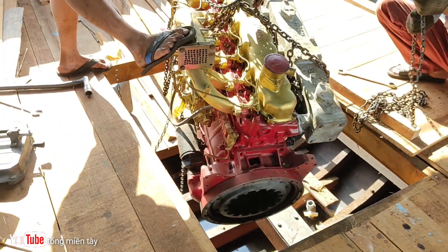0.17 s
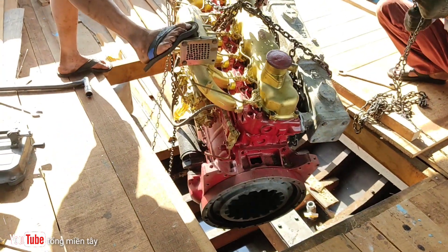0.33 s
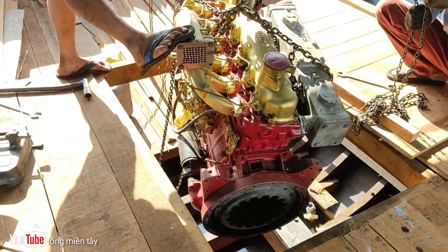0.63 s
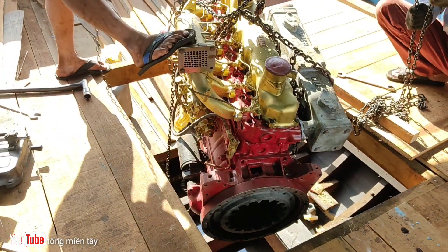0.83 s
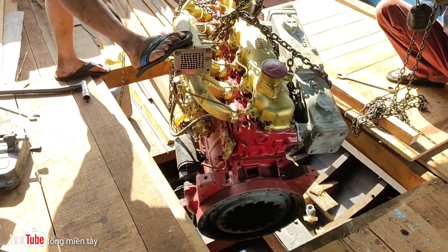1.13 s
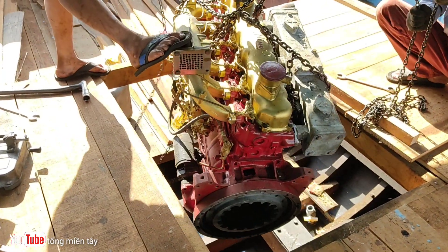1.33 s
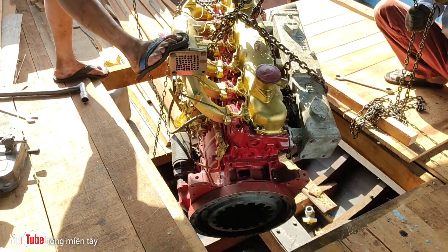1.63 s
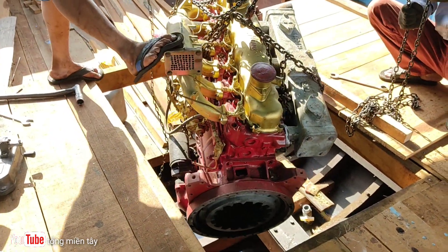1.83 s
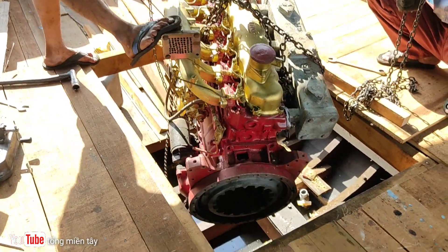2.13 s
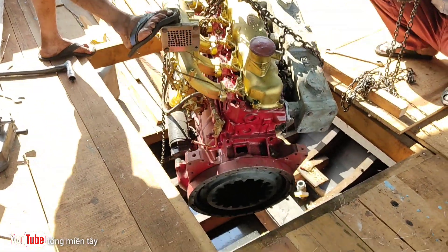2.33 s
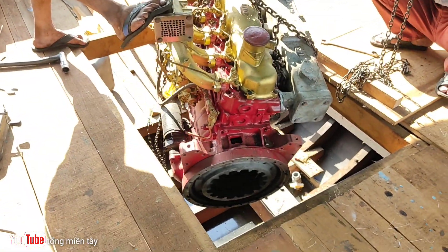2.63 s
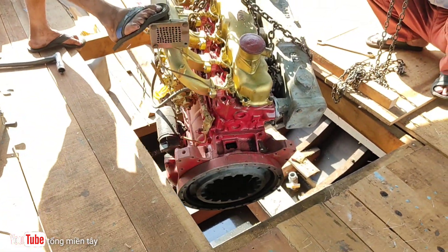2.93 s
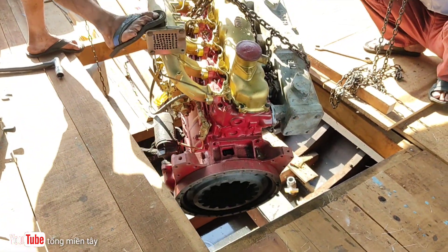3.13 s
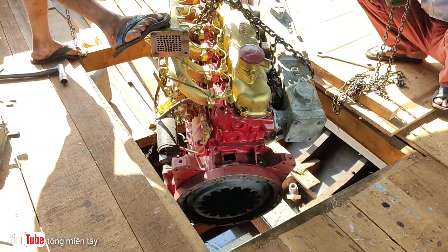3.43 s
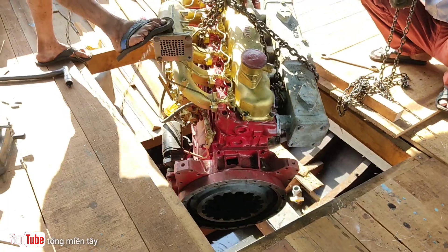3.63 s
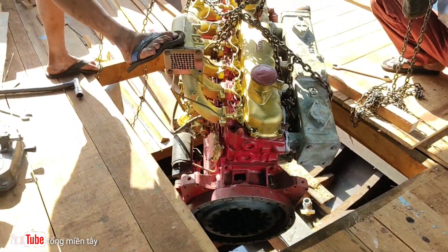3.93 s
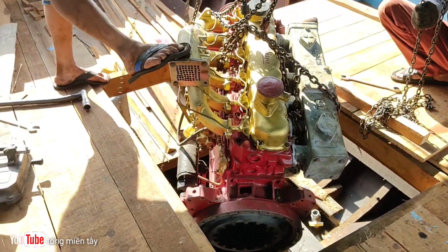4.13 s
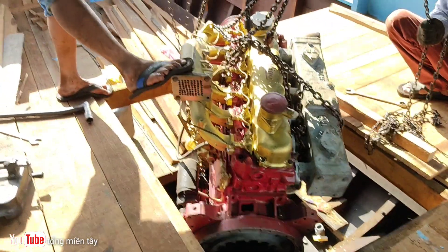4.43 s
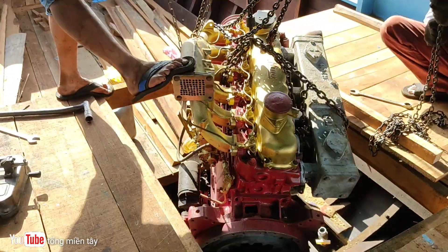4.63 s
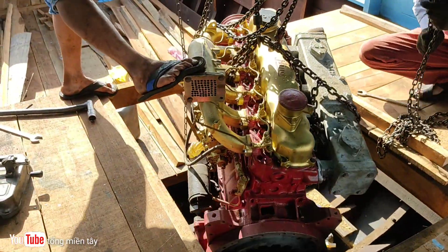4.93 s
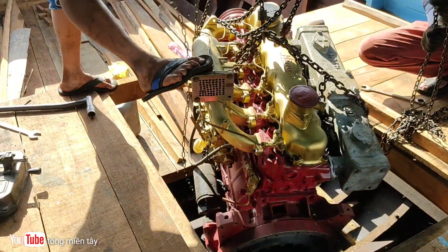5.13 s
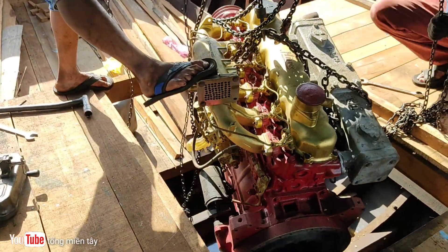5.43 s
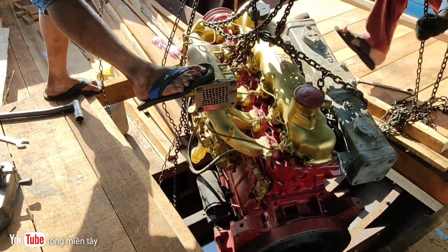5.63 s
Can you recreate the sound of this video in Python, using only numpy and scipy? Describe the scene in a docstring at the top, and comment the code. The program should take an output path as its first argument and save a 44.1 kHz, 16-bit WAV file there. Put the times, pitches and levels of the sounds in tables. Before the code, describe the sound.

Bright chain links rattle and clatter on planks in quick pulls, loose links clinking between them, while a far-off saw-like whine drops away.

```python
"""A wooden boat deck by a yard: hand chains are hauled through hoists.
In each pull links rattle over the wheel and onto the planks; between pulls they swing, slide and clink.
Chains are random contacts, coloured and fed to resonators, under level curves of each pull.
Low groans, a hull boom, knocks, clanks and a squeak join in. A far power tool, built of sines and hiss,
whines and runs down with an echo; the yard is a wavering noise floor."""
import sys
import numpy as np
from scipy import signal
from scipy.fft import rfft, irfft
from scipy.io import wavfile

SR = 44100
rng = np.random.default_rng(int(sys.argv[2]) if len(sys.argv) > 2 else 0)


def file_out(sig):
    """Save sig as 16-bit WAV at sys.argv[1]."""
    # one column per channel
    cols = np.atleast_2d(sig).T
    # limit, then scale
    lim = np.clip(cols, -1, 1)
    pcm = np.round(lim * 32767).astype(np.int16)
    wavfile.write(sys.argv[1], SR, pcm)


N = 255339
TIME_S = np.arange(N) / SR
BIN_HZ = np.maximum(np.fft.rfftfreq(N + 1, 1 / SR), 1)
# All dB levels in the tables are relative.
# Sources give two paths: the first reaches both microphones alike, the second with opposite sign.


def amp(db):
    """dB to gain."""
    return 10 ** (np.asarray(db) / 20)


def rms_one(x):
    """Scale to rms 1."""
    return x / np.sqrt(np.mean(x ** 2) + 1e-20)


def in_time(tables):
    """Curve columns at every sample, linear between rows."""
    s, *columns = np.transpose(np.concatenate(tables))
    return [np.interp(TIME_S, s, column) for column in columns]


def at_hz(points, hz):
    """A spectrum table read on a log-frequency axis."""
    table_hz, values = np.array(points).T
    return np.interp(np.log(hz), np.log(table_hz), values)


def colour(x, spectrum):
    """Smooth spectral shape."""
    return irfft(rfft(x, N + 1) * amp(at_hz(spectrum, BIN_HZ)))[..., :N]


def ring(x, hz, width_hz):
    """Two-pole resonator: a unit click starts a decaying sine of height near 1."""
    radius = np.exp(-np.pi * width_hz / SR)
    angle = 2 * np.pi * hz / SR
    return signal.lfilter([0, np.sin(angle)], [1, -2 * radius * np.cos(angle), radius ** 2], x + 1e-18)


def body(hits, modes):
    """Resonances in parallel, signs alternating; white input of rms 1 gives each its dB."""
    out = 0
    for k, (hz, width_hz, db) in enumerate(modes):
        gain = amp(db) * np.sqrt(4 * np.pi * width_hz / SR)
        out = out + (-1) ** k * gain * ring(hits, hz, width_hz)
    return out


def drift(rate_hz):
    """Slow chance: random knots of spread 1, joined by lines."""
    knots = rng.standard_normal(int(N / SR * rate_hz) + 2)
    return np.interp(TIME_S * rate_hz, np.arange(len(knots)), knots)


def contacts(per_s, spread_db):
    """Two unrelated trains of random contacts of uneven size and random sign, rms 1."""
    signs = rng.choice([-1, 1], (2, N))
    sizes = amp(spread_db * np.minimum(rng.exponential(1, (2, N)), 4)) * signs
    return rms_one(sizes * (rng.random((2, N)) < per_s / SR))


def settling(events, rise_s=0.00021):
    """Envelopes: each event rises quickly and dies away; its shift weakens path one, lifts path two."""
    power = np.zeros((2, N))
    for peak_s, peak_db, t60_s, shift_db in events:
        t = np.arange(N - round((peak_s - rise_s) * SR)) / SR
        settle = amp(peak_db - 60 * t / max(t60_s, .02)) * np.minimum(t / max(rise_s, 1e-4), 1)
        power[:, N - len(t):] += (settle * amp([[-shift_db], [shift_db]])) ** 2
    return np.sqrt(power)


def whine(tables, blur_rad):
    """A tone's phase follows its pitch curve, wandering differently on each path; ends are faded."""
    pitch_hz, level_db = in_time(tables)
    start_s, end_s, fade_s = tables[0][0][0], tables[-1][-1][0], 0.039
    heard = np.clip(np.minimum(TIME_S - start_s, end_s - TIME_S) / fade_s, 0, 1)
    clean = 2 * np.pi * np.cumsum(pitch_hz) / SR
    blurred = np.array([clean + blur_rad * drift(70) for path in range(2)])
    return clean, blurred, heard * amp(level_db + 4.5)


WAKE_DB = 14   # how far below full level a pull starts


def stroke(start_s, rise_s, stop_s, fall_db_per_s):
    """Level in dB against full as a pull wakes, holds and dies away; and the share of it gone by."""
    waking_db = WAKE_DB * np.maximum(1 - (TIME_S - start_s) / max(rise_s, .002), 0)
    falling_db = fall_db_per_s * np.maximum(TIME_S - stop_s, 0)
    return -waking_db - falling_db, np.clip((TIME_S - start_s) / (stop_s - start_s), 0, 1)


# Pulls on the hand chain. Each row: start in seconds, rise to full speed in seconds, length in seconds,
# link rattle in dB, slackening by the end in dB, plank clatter in dB, deck ringing in dB, hull boom in dB.
PULLS = [(-.05, 0.0056, 0.13, -15.5, 11, -22.5, -23, -21.5),
         (0.586, 0.022, 0.37, -20, 1.5, -19.5, -24.5, -21.5),
         (2.202, 0.056, 0.15, -18, 3.5, -22, -24, -20.5), (2.762, 0.018, 0.36, -19, 5, -23.5, -21.5, -24.5),
         (3.535, 0.048, 0.36, -18, 2.5, -19.5, -21, -20.5), (5.083, 0.01, 0.3, -21, 2.5, -23.5, -26, -21.5),
         (5.402, 0.0075, 0.19, -21.5, -0.5, -24.5, -24.5, -22.5)]
# A few slack links slide. Each row: loudest moment in seconds, link rattle in dB, plank clatter in dB,
# deck ringing in dB, dying away in dB per second.
SLIDES = [(0.245, -45, -24.5, -21, 105), (.3, -46, -26.5, -25, 137), (.46, -37, -41, -52, 245),
          (1.095, -26.5, -37, -50, 165), (1.239, -30, -60, -63, 300), (1.741, -33.5, -36, -42, 350),
          (2.063, -33.5, -56, -41, 190), (2.516, -36, -29, -41, 163), (2.606, -24.5, -59, -48, 200),
          (3.464, -24.5, -45, -57, 100), (4.211, -27, -31, -26, 250), (4.276, -21, -29.5, -45, 243),
          (4.48, -32.5, -44, -48, 77), (4.578, -25.5, -47, -50, 200), (4.6, -40, -29.5, -35, 170),
          (4.718, -52, -34.5, -42, 64), (4.79, -32.5, -58, -57, 148), (4.87, -47, -39, -55, 98),
          (5.765, -39, -32, -41, 254)]
# The hanging chains never quite rest. Each row: time in seconds, link rattle in dB, plank clatter in dB,
# deck ringing in dB, hull boom in dB.
SWING = [(0, -24, -50, -37, -29), (.55, -51, -46, -46, -42), (1.1, -42, -49, -63, -27.5),
         (1.5, -42.5, -46.5, -52, -39.5), (1.7, -46.5, -53, -67, -40), (2.15, -45, -45.5, -50, -58),
         (2.7, -37, -65, -56, -37.5), (3.3, -43.5, -47, -49, -27.5), (3.5, -42, -38.5, -55, -37),
         (4.1, -38, -40, -38, -24), (4.42, -44, -46, -55, -37.5), (4.7, -41.5, -40.5, -42, -37.5),
         (5.04, -43, -60, -60, -30.5), (5.79, -44, -65, -43, -28)]
RATTLE_FALL_DB_PER_S, SLIDE_RISE_DB_PER_S = 186, 448
# links reach the planks late, thickest in mid pull
CLATTER_EXTRA_RISE_S, CLATTER_ARCH_DB, CLATTER_FALL_DB_PER_S = 0.048, 7, 194
RINGING_RISE_S, RINGING_FALL_DB_PER_S = 0.0083, 199
BOOM_EXTRA_RISE_S, BOOM_LINGERS_S, BOOM_FALL_DB_PER_S = 0.062, 0.063, 98


def haul():
    """Levels in dB of rattle, clatter, ringing and boom: powers of swinging, pulls and slides add up."""
    power = amp(in_time([SWING])) ** 2
    for start_s, rise_s, length_s, rattle_db, slacken_db, clatter_db, ringing_db, boom_db in PULLS:
        stop_s = start_s + length_s
        rattle, gone = stroke(start_s, rise_s, stop_s, RATTLE_FALL_DB_PER_S)
        clatter, _ = stroke(start_s, rise_s + CLATTER_EXTRA_RISE_S, stop_s, CLATTER_FALL_DB_PER_S)
        ringing, _ = stroke(start_s, RINGING_RISE_S, stop_s, RINGING_FALL_DB_PER_S)
        boom, _ = stroke(start_s, rise_s + BOOM_EXTRA_RISE_S, stop_s + BOOM_LINGERS_S, BOOM_FALL_DB_PER_S)
        arch_db = CLATTER_ARCH_DB * (2 * gone - 1) ** 2
        power += amp([rattle_db + rattle - slacken_db * gone,
                      clatter_db + clatter - arch_db,
                      ringing_db + ringing,
                      boom_db + boom]) ** 2
    for peak_s, *levels_db, fall_db_per_s in SLIDES:
        shape_db = np.minimum(SLIDE_RISE_DB_PER_S * (TIME_S - peak_s), fall_db_per_s * (peak_s - TIME_S))
        power[:3] += amp(np.add.outer(levels_db, shape_db)) ** 2
    return 10 * np.log10(power)


# A slack loop of chain jolts. Each row: peak in seconds, peak in dB, settling t60 in seconds, path shift in dB.
JOLTS = [(0.208, -17, 0.15, 3), (0.289, -28.5, 0.18, 2), (0.4255, -21, 0.29, 1), (0.559, -25, 0.13, 1),
         (0.5846, -13.5, 0.092, 2), (1.072, -20, 0.23, -0.5), (1.213, -28.5, 0.22, 6),
         (1.317, -19.5, 0.083, 1.5), (1.7158, -21, 0.1, 4.5), (2.0195, -27.5, 0.48, 1),
         (2.1638, -26, 0.12, -2), (2.1998, -13, 0.18, -3), (2.5092, -19.5, 0.21, 2),
         (2.5566, -23, 0.46, 4.5), (2.7302, -19.5, 0.11, 2.5), (2.7727, -21, 0.14, -3),
         (3.389, -15, 0.11, 0.5), (3.4536, -20.5, 0.087, 4.5), (3.479, -23, 0.11, 3),
         (3.5043, -14.5, 0.093, 1.5), (3.559, -13, 0.1, -2), (4.2025, -12.5, 0.047, 3),
         (4.247, -15, 0.17, -1), (4.449, -33.5, 1, -5), (4.5492, -22, 0.16, 2), (4.599, -25, 0.12, 0),
         (4.737, -24, 0.085, 0.5), (4.9955, -27, 0.059, -6), (5.078, -27.5, 0.33, -10), (5.092, -18, 1, 0),
         (5.4056, -15, 0.1, 0), (5.755, -18.5, 0.18, 1)]
# Thin links chink. Each row: peak in seconds, peak in dB, settling t60 in seconds, path shift in dB.
CHINKS = [(0.1835, -36, 0.2, 0), (0.415, -32, 0.33, 0), (1.0725, -31, 0.2, 0), (1.2131, -25, 0.28, 3),
          (1.4815, -36, 0.14, 0), (1.6841, -31, 0.17, 2), (2.018, -22, 0.28, 0), (2.2169, -28, 0.2, 3),
          (2.4992, -36, 0.2, 2), (2.7402, -35, 0.19, 2), (3.3897, -29, 0.25, -1), (3.4291, -28, 0.18, 0),
          (3.5149, -29, 0.2, 1), (4.2492, -38, 0.2, 0), (4.4493, -38, 0.18, -1), (4.6029, -32, 0.29, 0),
          (4.8219, -37, 0.18, 0), (5.4056, -33, 0.2, 0),]
# Tick spectrum of steel links. Each row: frequency in Hz, density in dB per Hz.
LINKS = [(1760, -15), (3000, -9), (3440, -9), (4070, -9), (4800, -7.5), (6030, -9), (6730, -2), (8570, 0.5),
         (9510, -4.5), (10300, -15.5), (13200, -22), (14600, -28), (15600, -45)]
# Treble filter for quiet passages. Each row: frequency in Hz, gain in dB.
QUIET_TREBLE = [(9600, -3), (10800, -11.5)]
# Resonances of the links. Each row: frequency in Hz, width in Hz, level in dB.
LINK_RINGS = [(3614, 50, -12), (4013, 21, -8.5), (4430, 24, -13.5), (5490, 35, -7.5), (5880, 36, -7),
              (6400, 15, -4), (6930, 48, -5), (7380, 17, -1.5), (7520, 18, -2.5), (8030, 23, -1.5),
              (8390, 18, -1), (8790, 13, -0.5), (8800, 19, -5), (9330, 120, -3)]
# Resonances of a thin link. Each row: frequency in Hz, width in Hz, level in dB.
THIN_LINK = [(12780, 30, 0), (13030, 43, -4), (12610, 98, -3.5)]
LINK_SPREAD = .012   # links differ by this share in pitch
JOLT_RISE_S = 0.0014   # a loop jolts link after link


def links(rattle_db):
    """Steel links tick against each other; a sparser set of contacts each rings one link pitch."""
    drive = np.hypot(amp(rattle_db + 2.0 * drift(70)), amp(-3.5) * settling(JOLTS, JOLT_RISE_S))
    ticks = colour(contacts(per_s=4000, spread_db=1.0) * drive, LINKS)
    quiet = np.clip(1 - drive / amp(-23.0), 0, 1)
    ticks = ticks * (1 - quiet) + colour(ticks * quiet, QUIET_TREBLE)

    hits = contacts(per_s=650, spread_db=3.0) * drive * amp(3 * drift(80))
    pitches = [(hz * (1 + LINK_SPREAD * step), width_hz, db)
               for hz, width_hz, db in LINK_RINGS for step in (-1, 0, 1)]
    dealt = rng.integers(0, len(pitches), (2, N))
    rings = sum(body(hits * (dealt == k), [mode]) for k, mode in enumerate(pitches))

    # thin links jingle at the least motion, so they follow the root of the drive
    thin_drive = np.hypot(amp(-40.5) * np.sqrt(drive), amp(-4.5) * settling(CHINKS, 2 * JOLT_RISE_S))
    thin = thin_drive * contacts(per_s=1100, spread_db=3.5)
    return amp(11.0) * ticks + amp(3.0) * rings + body(thin, THIN_LINK)


# Dull clatter of the planks. Each row: frequency in Hz, density in dB per Hz.
DECK = [(180, -10), (300, -5), (599, -3.5), (975, 0), (1320, -1.5), (1590, -6.5), (2610, -2), (3060, -11),
        (4500, -21.5), (5850, -51), (9900, -120)]
# Deck resonances. Each row: frequency in Hz, width in Hz, level in dB.
DECK_RINGS = [(996.5, 53, 1), (1117, 137, -1.5), (913, 66, -17), (2520, 57, -12), (1984, 25, -12.5)]
# The deck's higher ring. Each row: frequency in Hz, width in Hz, level in dB.
HIGH_RING = [(1297.4, 17, -5.5)]
# Higher ring against the other deck rings. Each row: time in seconds, level in dB.
HIGH_RING_SHARE = [(0, 0), (1, -16), (2.3, -6.5), (3, -6), (3.8, -5), (5.0, 8.5), (5.5, -1), (5.56, -9),
                   (5.79, -10)]
# Heavier links land, sounding DECK_RINGS. Each row: peak in seconds, peak in dB, settling t60 in seconds,
# path shift in dB.
LOW_RING_HITS = [(.287, -27, .1, 5), (2.206, -22.5, 0.044, -4), (2.356, -18, .05, 7),
                 (2.912, -17, 0.056, -1), (2.963, -21, 0.045, -3), (3.044, -20.5, 0.036, -3),
                 (3.812, -16, 0.038, -1), (5.266, -16, 0.045, -5), (5.347, -20, 0.031, -6),
                 (5.556, -21.5, 0.13, -8), (5.597, -17, 0.092, -1.5)]
# Heavier links land, sounding HIGH_RING. Each row: peak in seconds, peak in dB, settling t60 in seconds,
# path shift in dB.
HIGH_RING_HITS = [(.107, -19.5, 0.037, -1), (3.6366, -21, .05, 5), (5.085, -9.5, 0.079, 0),
                  (5.218, -14, 0.31, -3.5), (5.415, -14.5, .06, -3.5), (5.455, -8.5, 0.076, -3)]


def planks(clatter_db, ringing_db):
    """Links tumbling on the planks: dull clatter and the deck's own resonances."""
    hits = contacts(per_s=1500, spread_db=-0.5) * amp(2.0 * drift(30))
    landing = contacts(per_s=5000, spread_db=1.0) * amp(6)
    high_share_db = in_time([HIGH_RING_SHARE])[0]
    low = hits * amp(ringing_db) + landing * settling(LOW_RING_HITS)
    high = hits * amp(ringing_db + high_share_db) + landing * settling(HIGH_RING_HITS)
    clatter = colour(hits * amp(clatter_db), DECK)
    return amp(12.5) * clatter + amp(-5.5) * (body(low, DECK_RINGS) - body(high, HIGH_RING))


# Hull resonances. Each row: frequency in Hz, width in Hz, level in dB.
HULL = [(136.7, 28.4, 1.5), (166.6, 50, 3.5), (210.4, 45, 0.5), (310.6, 25, -10.5), (91.6, 14, -5)]


def hull(boom_db):
    """The hollow hull under the deck booms when the chain runs: noise through low resonances."""
    return rms_one(body(rng.standard_normal((2, N)), HULL)) * amp(boom_db - 6.0)


# A low tone sags in pitch as a pull sets in, one table per groan. Each row: time in seconds, pitch in Hz,
# level in dB.
GROANS = [
    [(2.2, 173.7, -44), (2.255, 166, -23), (2.29, 150, -36), (2.35, 156.6, -29), (2.46, 149, -46)],
    [(2.8, 187.2, -50), (2.86, 179.4, -34), (2.95, 134.4, -35), (3.11, 139.6, -32.5), (3.24, 135, -31),
     (3.31, 130, -42)],
]


def groans():
    """Nearly pure low tones, mostly alike on both sides."""
    out = 0
    for groan in GROANS:
        _, phase, level = whine([groan], blur_rad=0.74)
        out = out + level * np.sin(phase) * [[1], [.3]]
    return out


# Heavy things drop on a plank. Each row: peak in seconds, peak in dB, settling t60 in seconds, path shift in dB.
KNOCKS = [(4.149, -10.5, 0.053, 1), (4.163, -18.5, 0.11, -2), (4.174, -22, 0.12, -0.5)]
# Plank resonances. Each row: frequency in Hz, width in Hz, level in dB.
PLANK = [(500, 91, 3), (590, 47, 5), (810, 83, 0), (987, 130, 0), (1250, 260, 3.5), (1810, 790, -1),
         (2570, 400, -6)]


def knocks():
    """A short rough contact sets the plank booming."""
    return amp(-4.5) * body(settling(KNOCKS) * contacts(per_s=9000, spread_db=0.0), PLANK)


# A hook clanks on the casting. Each row: peak in seconds, peak in dB, settling t60 in seconds, path shift in dB.
CLANKS = [(3.7, -34, 0.099, -5), (4.254, -21, 0.17, -1.5), (3.391, -22, 0.03, 1)]
# Casting resonances. Each row: frequency in Hz, width in Hz, level in dB.
CASTING = [(946, 53, -3), (1293, 38, -4), (2065, 77, -3.5), (2597, 39, 2)]


def clanks():
    """Steel on cast iron: rough contact sets off a few short rings."""
    return body(settling(CLANKS) * contacts(per_s=5600, spread_db=-0.5), CASTING)


# Single links clink. Each row: start in seconds, pitch in Hz, level in dB, t60 in seconds.
CLINKS = [(2.511, 6300, -14, .03), (2.552, 7500, -12, .03), (2.705, 8500, -13.5, .04),
          (3.451, 7450, -10, .035), (4.472, 7850, -29, .05), (4.5495, 6270, -16, 0.073),
          (4.738, 7200, -27, .04), (4.8605, 4000, -35, .25), (4.86, 4900, -24, 0.045)]
TAP_S = .012   # a clink is a short run of touches


def clinks():
    """A short noise tap excites one ring."""
    out, touches = np.zeros((2, N)), round(TAP_S * SR)
    for start_s, hz, level_db, t60_s in CLINKS:
        first = round(start_s * SR)
        tap = np.zeros((2, N + touches))
        tap[:, first:first + touches] = amp(level_db) * rng.standard_normal((2, touches)) / np.sqrt(touches)
        width_hz = np.log(1000) / np.pi / max(t60_s, .01)
        out += ring(tap[:, :N], hz, width_hz)
    return out


# A faint squeak. Each row: time in seconds, pitch in Hz, level in dB.
SQUEAK = [(3.14, 2600, -56), (3.2, 2600, -49), (3.36, 2520, -52), (3.56, 2480, -54)]


def squeak():
    """A thin tone of wavering phase."""
    _, phase, level = whine([SQUEAK], blur_rad=1.9)
    return level * np.sin(phase)


# Far power tool, two tables joined into one curve. Each row: time in seconds, tooth pitch in Hz, level in dB.
TOOL = [
    [(.17, 4985, -48), (.3, 4986, -40), (.55, 4988, -39), (.6, 4988, -42)],
    [(1.0, 4990, -43), (1.2, 4992, -38), (1.47, 5003, -35), (1.6, 4960, -35), (1.7, 4820, -31),
     (1.8, 4710, -33.5), (1.9, 4530, -34.5), (2.045, 4300, -32), (2.09, 4200, -42), (2.24, 3930, -52)],
]
# Lines beside the tooth pitch. Each row: offset in steps of the turning rate, level in dB.
UNEVEN_TEETH = [(-2, -13), (-1, -9), (1, -4), (2, -8), (3, -9), (4, -9), (5, -13), (6, -15)]
# Hum of the loaded motor. Each row: multiple of the turning rate, level in dB.
MOTOR_HUM = [(1, -35.5), (3, -40.5), (4, -38), (5, -43), (6, -49)]
TEETH_PER_TURN = 94
CUT_START_S, CUT_END_S, LOAD_S, UNLOAD_S = .15, 1.55, .06, .3   # blade in the work; load ramps
HISS_ABOVE_HZ, HISS_WIDTH_HZ = 140, 220   # offset from tooth pitch at full load; half width
YARD_ECHO_T60_S, YARD_ECHO_DB = .25, -2


def yard_echo(far):
    """Convolve each path with decaying noise."""
    lag_s = np.arange(round(YARD_ECHO_T60_S * SR)) / SR
    tail = rng.standard_normal((2, len(lag_s))) * amp(-60 * lag_s / YARD_ECHO_T60_S)
    return signal.fftconvolve(far, rms_one(tail) / np.sqrt(len(lag_s)), axes=1)[:, :N]


def power_tool():
    """Teeth whine; uneven ones add lines a turning rate apart, amid hiss, echo and a loaded motor's hum."""
    clean, phase, level = whine(TOOL, blur_rad=0.75)
    phase = phase + [[0], [np.pi / 2]]   # a quarter cycle between the paths keeps the tone in the middle
    turn = clean / TEETH_PER_TURN
    load = np.clip(np.minimum((TIME_S - CUT_START_S) / LOAD_S, 1 - (TIME_S - CUT_END_S) / UNLOAD_S), 0, 1)

    lowpass = signal.butter(2, HISS_WIDTH_HZ, fs=SR, output="sos")
    flutter = rms_one(signal.sosfilt(lowpass, rng.standard_normal((2, 2, N))))
    above = clean + 2 * np.pi * HISS_ABOVE_HZ * np.cumsum(load) / SR
    hiss = flutter[0] * np.cos(above) + flutter[1] * np.sin(above)

    beside = 0
    for k, db in UNEVEN_TEETH:
        unloaded_db = 2.5 * max(k - 1, 0) * (1 - load)   # upper lines weaken off load
        beside = beside + amp(db + 3 * drift(12) - unloaded_db) * np.sin(phase + k * turn + drift(8))
    tooth = (1 - .3 * load) * amp(3 * drift(25)) * np.sin(phase)
    octave = .13 * (1 - load) * np.sin(2 * phase)
    tone = tooth + (.7 + .1 * load) * beside + octave
    far = level * (.6 * tone + (.22 + .08 * load) * hiss)

    hum = sum(amp(db + 2.6 * drift(7.9)) * np.sin(k * turn + 1.53 * drift(9)) for k, db in MOTOR_HUM)
    echoed = far + amp(YARD_ECHO_DB) * yard_echo(far)
    return amp([[5.0], [1.5]]) * echoed + load * hum * [[1], [.4]]


# Yard spectrum. Each row: frequency in Hz, density in dB per Hz.
YARD = [(12, -38), (20, 2.5), (64, 1), (233, -4.5), (385, -9.5), (1260, -17), (1600, -21.5), (2510, -21),
        (3100, -22.5), (5250, -40), (8670, -27.5), (9390, -30), (11000, -50), (14300, -80), (22000, -120)]


def yard():
    """Wind, water and far engines as one wavering noise floor, heavy in the bass."""
    return rms_one(colour(rng.standard_normal((2, N)), YARD)) * amp(-36 + 0.66 * drift(2.9))


# Correlation between the microphones. Each row: frequency in Hz, left-right likeness (1 = identical).
LIKENESS = [(60, 0.86), (150, 0.74), (380, 0.67), (950, 0.099), (2380, 0.087), (5980, 0.12), (15000, 0.19)]
# Colour of the microphone pair. Each row: frequency in Hz, left over right in dB.
EARS = [(25, 14), (110, 1.5), (200, 4.5), (380, 5), (700, 4), (1290, 3), (2380, 1), (4400, 1.5),
        (6000, -2.5), (8120, 7), (15000, 5.5)]
PORT_LAG_S = 7e-5   # the left port hears later


def microphones(paths):
    """Two sound paths mix into left and right, most alike in the bass, each port with its own colour."""
    mid, side = rfft(paths, N + 1)
    alike = np.clip(at_hz(LIKENESS, BIN_HZ), -1, 1)
    tilt = amp(at_hz(EARS, BIN_HZ) / 2) * np.exp(-1j * np.pi * BIN_HZ * PORT_LAG_S)
    mid, side = np.sqrt(1 + alike) * mid, np.sqrt(1 - alike) * side
    return irfft(np.array([(mid + side) * tilt, (mid - side) / tilt]))[:, :N]


RINGING_WAVER_DB = 1.5
# the hauled chain hangs right of the slack ones: left-right dB, rattle level where it takes over, span
HAULED_PAN_DB, HAULED_FROM_DB, HAULED_SPAN_DB = -2, -32, 11


def scene():
    """All sources through the microphone pair."""
    rattle_db, clatter_db, ringing_db, boom_db = haul()
    chains = links(rattle_db) + planks(clatter_db, ringing_db + RINGING_WAVER_DB * drift(12))
    hauled = np.clip((rattle_db - HAULED_FROM_DB) / HAULED_SPAN_DB, 0, 1)
    pan = amp(HAULED_PAN_DB / 2 * hauled * [[1], [-1]])
    boat = hull(boom_db) + groans() + knocks() + clanks() + clinks()
    return microphones(chains) * pan + microphones(boat + power_tool() + squeak() + yard())


OFFSET = -0.0027   # steady offset of the converter
CUTOFF_HZ = 15950


def record(dry):
    """Peaks are rounded, the top is cut."""
    lowpass = signal.cheby2(16, 70, CUTOFF_HZ, fs=SR, output="sos")
    return signal.sosfilt(lowpass, np.tanh(dry / 1.217) * 0.95 + OFFSET)


dry = scene()
out = record(dry)
file_out(out)
```